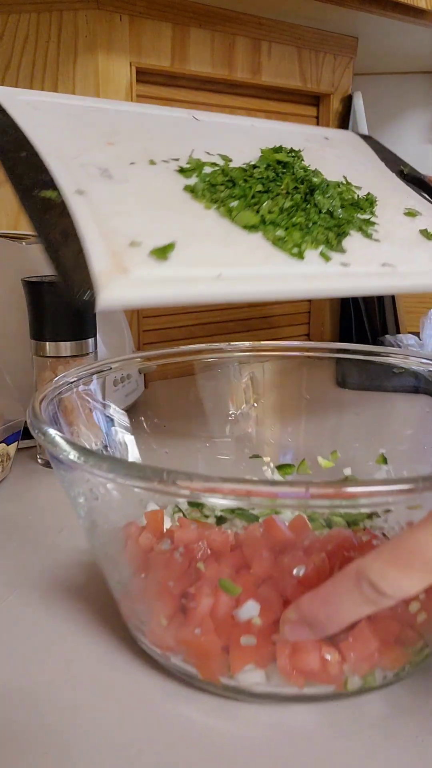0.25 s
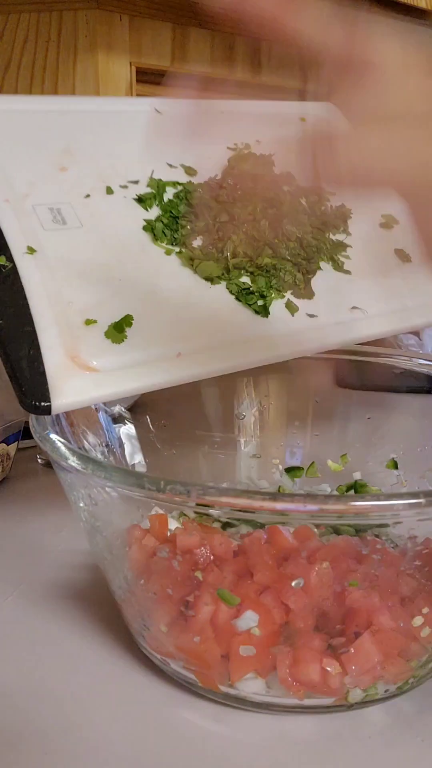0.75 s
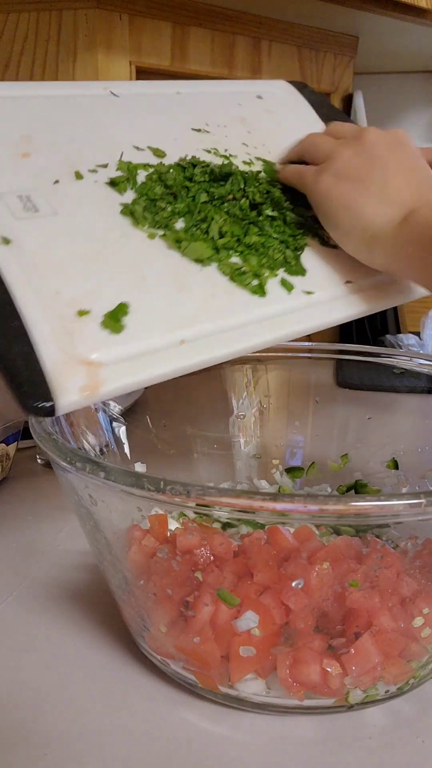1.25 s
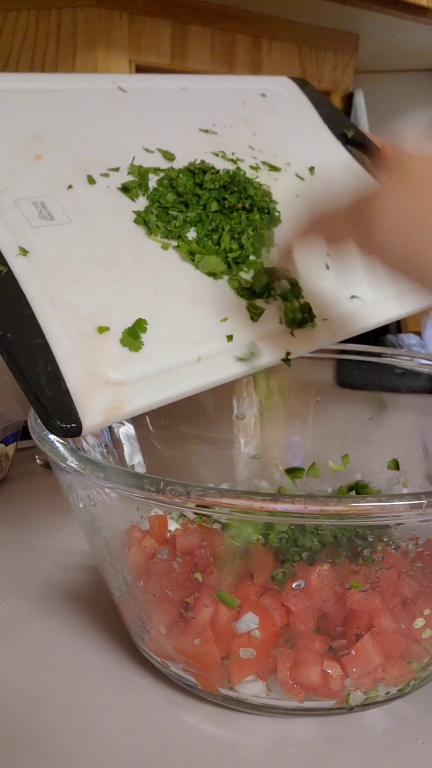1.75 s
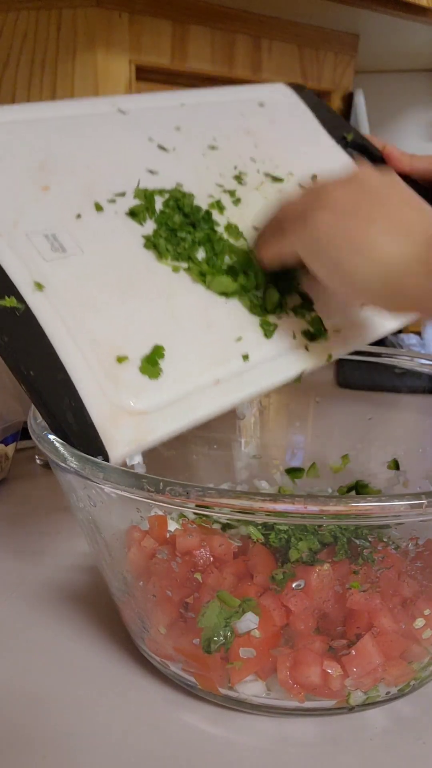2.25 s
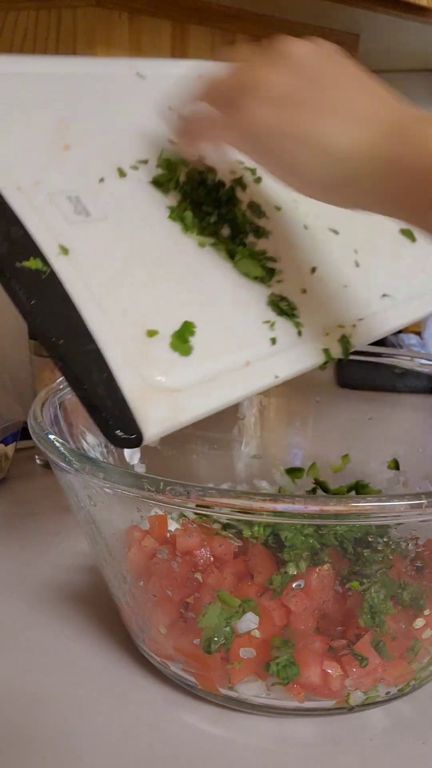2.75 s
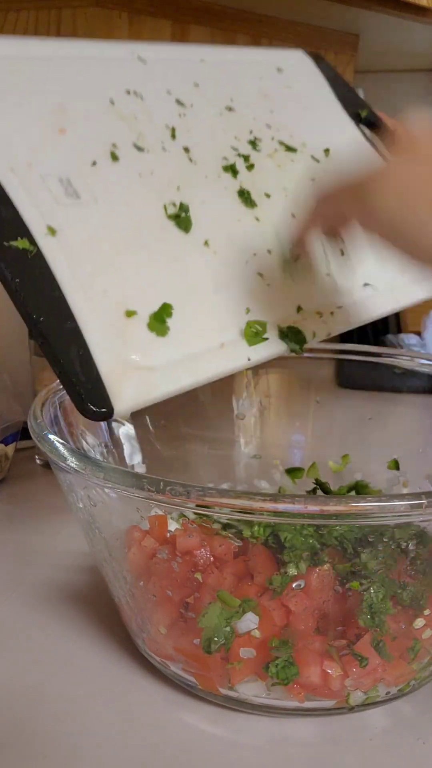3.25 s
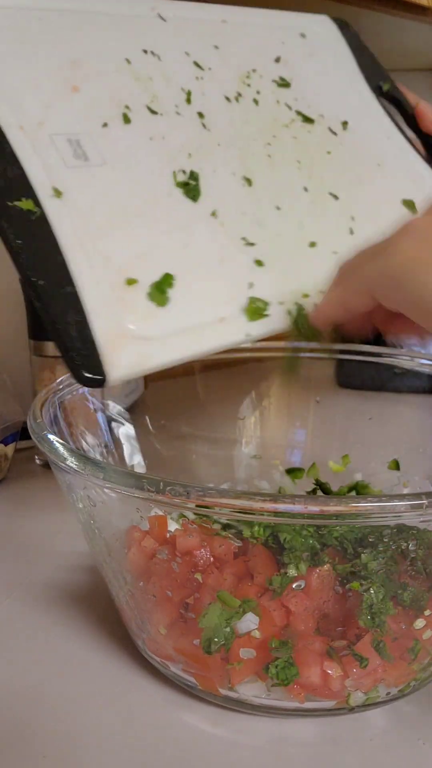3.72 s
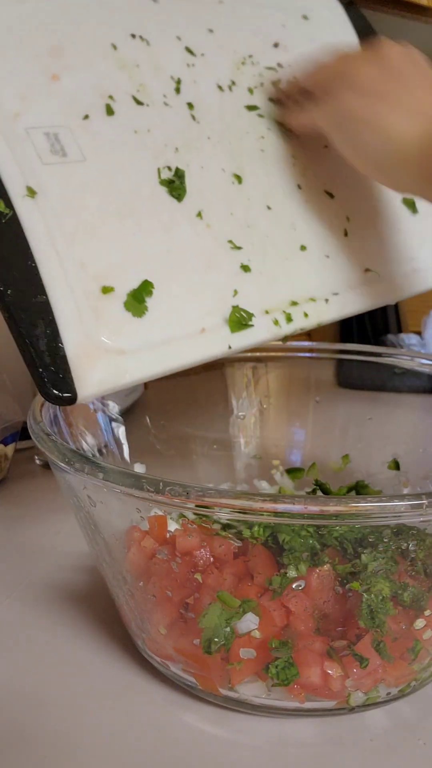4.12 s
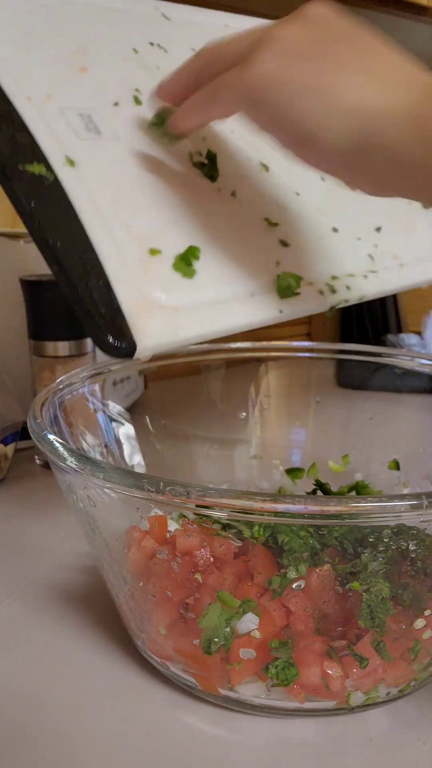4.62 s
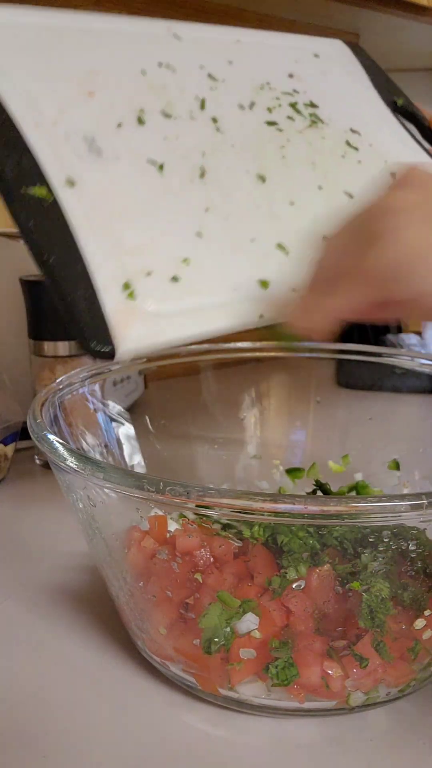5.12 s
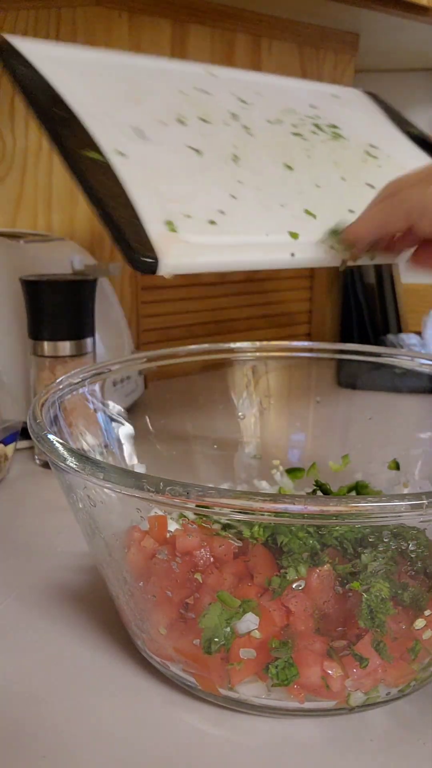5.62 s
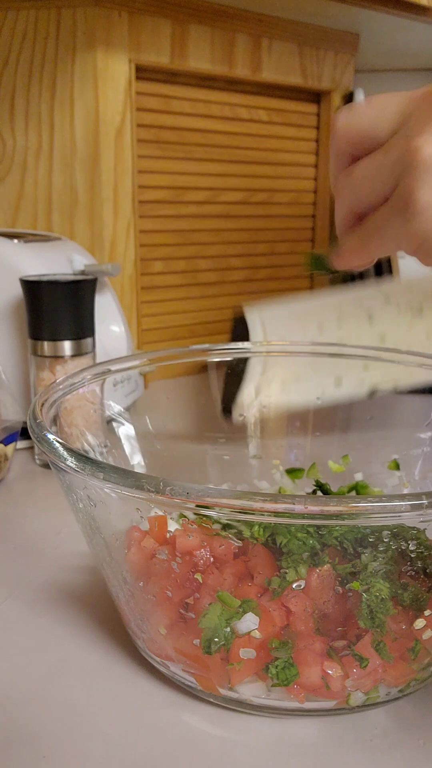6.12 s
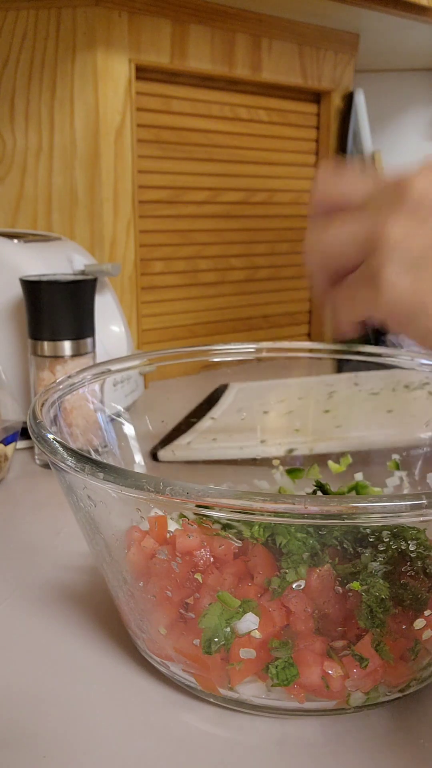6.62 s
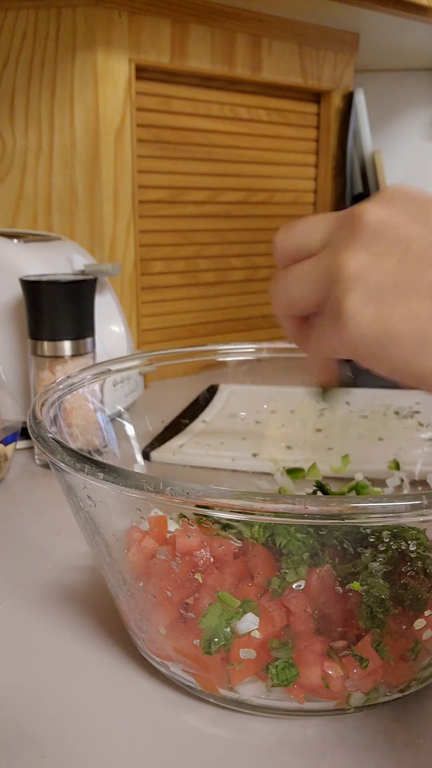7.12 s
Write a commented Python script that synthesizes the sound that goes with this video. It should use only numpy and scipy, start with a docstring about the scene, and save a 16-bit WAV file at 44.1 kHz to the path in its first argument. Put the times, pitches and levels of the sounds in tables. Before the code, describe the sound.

Fingers rub and flick wet chopped herbs off a plastic board after a knock against a glass bowl, over a low refrigerator hum.

```python
"""A refrigerator hums in a small kitchen throughout. First a plastic cutting board bumps against a
glass bowl, and the glass rings briefly. Then a hand sweeps chopped herbs off the board, stroke by
stroke: skin and wet leaves rub, hiss and squelch, and the fingers flick over the edge. At last the
board is laid on the counter, where it rocks from edge to edge and rattles to rest."""
import sys
import numpy as np
from scipy import signal
from scipy.fft import rfft, irfft, next_fast_len
from scipy.io import wavfile
from scipy.ndimage import map_coordinates

SR = 44100
rng = np.random.default_rng(int(sys.argv[2]) if len(sys.argv) > 2 else 0)


def inscribe(sig):
    """Save sig as 16-bit PCM at rate SR to the path in sys.argv[1].

    A 1-D sig is mono; a 2-D sig holds one channel per row.
    Samples are clipped to [-1, 1] before scaling.
    """
    pcm = np.round(np.clip(np.atleast_2d(sig).T, -1, 1) * 32767)
    wavfile.write(sys.argv[1], SR, pcm.astype(np.int16))


N = 324576

# The tone of skin and leaves rubbing on plastic: pitch_hz, level_db
RUB_TONE = [(150, -56), (400, -0.5), (800, -4.5), (1400, -3), (2050, -2.5), (2600, -4.5), (3600, -1.5),
            (5000, -5), (6300, -8.5), (7600, -5), (9000, -17), (16000, -50)]
# A low note of the board, heard as a soft thump: pitch_hz, level_db, fade_s (time to fall by 60 dB)
THUMP_NOTE = [(208.8, 0, 0.11)]


def amp(db):
    """Turn decibels into a volume factor."""
    return 10 ** (np.asarray(db) / 20)


def unit(x):
    """Scale a signal to an average (rms) level of 1."""
    return x / np.sqrt(np.mean(x ** 2) + 1e-20)


def along(points, hz):
    """Read between the rows of a (pitch_hz, value) table, giving each octave equal room."""
    pitches, values = np.transpose(points)
    return np.interp(np.log(hz + 1), np.log(pitches), values)


def wobble(rate):
    """A smooth curve through `rate` random values a second."""
    return map_coordinates(rng.standard_normal(int(N * rate / SR) + 4), [np.arange(N) * rate / SR])


def filtered(x, response):
    """Multiply each frequency in x by response(hz)."""
    n = x.shape[-1]
    padded = next_fast_len(n + 8192)
    return irfft(rfft(x, padded) * response(np.fft.rfftfreq(padded, 1 / SR)), padded)[..., :n]


def noise(tone, grain_db=0):
    """Noise with a given tone; grain_db breaks it into tiny slips of uneven size."""
    slips = rng.standard_normal(N) * amp(grain_db * wobble(900))
    return unit(filtered(slips, lambda hz: amp(along(tone, hz))))


def narrow_noise(pitch_hz, width_hz, size):
    """Noise close to one pitch, `size` samples long."""
    return unit(filtered(rng.standard_normal(size), lambda hz: np.exp(-((hz - pitch_hz) / width_hz) ** 2)))


def spread(pair, likeness):
    """Blend two unrelated signals into left and right (likeness 1: the same, 0: unrelated)."""
    turn = lambda hz: np.arccos(np.clip(along(likeness, hz), -1, 1)) / 2
    mid, side = filtered(pair, lambda hz: np.array([np.cos(turn(hz)), np.sin(turn(hz))]))
    return np.array([mid + side, mid - side])


def add(track, start_s, sound):
    """Mix a sound into a track."""
    part = track[..., max(round(start_s * SR), 0):][..., :sound.shape[-1]]
    part += sound[..., :part.shape[-1]]


def ring(notes, attack_s, dull_above_hz):
    """A struck object rings with its own fading notes; the blow barely stirs the highest ones."""
    t = np.arange(SR) / SR
    hz, db, fade_s = np.transpose(notes)[:, :, None]
    strength = amp(db) / (1 + (hz / dull_above_hz) ** 2)
    sign = (-1) ** np.arange(len(hz))[:, None]  # neighbouring notes start in opposite directions
    tones = sign * strength * amp(-60 * t / fade_s) * np.sin(2 * np.pi * hz * t)
    return tones.sum(0) * (1 - np.exp(-t / attack_s)) / np.linalg.norm(amp(db))


def knocks(blows, notes, clack_tone, tick_tone, contact_s, tick_db, attack_s, bright_hz,
           clack_fade_s, tick_fade_s):
    """Each blow makes the board thump; harder contact adds plastic clack and, faster still, gritty tick."""
    t = np.arange(SR // 2) / SR
    thump, clack, tick = np.zeros((3, N))
    for start_s, thump_db, hardness_db in blows:
        dull_above_hz = bright_hz * amp(.8 * thump_db)  # gentle blows are duller
        clack_db = thump_db + hardness_db
        touch_s = contact_s * (1 + max(-21 - hardness_db, 0) / 5)  # soft blows touch for longer
        press = np.minimum(t / (0.33 * touch_s), 1)
        since = np.maximum(t - touch_s, 0)
        add(thump, start_s, amp(thump_db) * ring(notes, attack_s, dull_above_hz))
        add(clack, start_s, press * amp(clack_db - 60 * since / clack_fade_s))
        add(tick, start_s, press * amp(clack_db + tick_db + 1.05 * hardness_db - 60 * since / tick_fade_s))
    return thump, clack * noise(clack_tone) + tick * noise(tick_tone, grain_db=-5.5)


def in_kitchen(x, lead_ms, left_db, near_db, room_db, step, near_fade_s=0.066):
    """Direct sound in stereo, quick echoes off counter and cupboards, then the room's fading tail."""
    room_fades = [(150, 0.51), (1000, 0.22), (4500, 0.27), (9000, 0.092), (15000, 0.21)]  # how long the room rings: pitch_hz, fade_s
    echo_likeness = [(100, .9), (300, 0.95), (1200, 0), (3000, 0.018)]  # how alike left and right are: pitch_hz, likeness
    direct = filtered(x, lambda hz: np.exp(np.outer([1, -1], 1j * np.pi * hz * lead_ms / 1e3)))
    direct *= amp([[left_db], [-left_db]])
    hz, t, scatter = signal.stft(rng.standard_normal((2, 2, SR // 2)), SR, nperseg=256)
    near_decay = amp(-60 * t / near_fade_s) * np.ones((len(hz), 1))
    room_decay = amp(-60 * t / along(room_fades, hz)[:, None])
    decay = np.array([near_decay, room_decay])[:, None]
    padded = np.pad(x, (step, 2 * step))
    echoes = np.zeros((2, N + step))
    for start in range(0, N + step, step):  # the source moves: a new echo pattern every `step` samples
        piece = padded[start:start + 2 * step] * signal.windows.cosine(2 * step)
        shift = rng.integers(len(t))
        if np.abs(piece).max() > 1e-5:
            near, tail = signal.istft(np.roll(scatter, shift, axis=-1) * decay, SR, nperseg=256)[1]
            echo = amp(near_db) * near / np.linalg.norm(near[0])
            echo += amp(room_db) * tail / np.linalg.norm(tail[0])
            add(echoes, start / SR + .001, signal.fftconvolve(piece[None], echo, axes=1))
    return direct + spread(echoes[:, step:], echo_likeness)


def refrigerator(drift_s=0.00011):
    """The compressor hums, its shaft drifting slightly, with thin whines over the rush of a fan."""
    hum_notes = [(59.2, -58), (118.4, -56), (328.4, -78.5), (495.3, -72), (699.8, -75), (818.3, -82.5)]  # the compressor's steady notes: pitch_hz, level_db
    whines = [(4970, -97), (7250, -96.5)]  # thin high whines: pitch_hz, level_db
    fan_tone = [(18, -24.5), (45, -4), (85, -3), (150, -6), (330, -12), (500, -15), (600, -18), (720, -12),
                (1000, -27.5), (1400, -28.5), (2500, -44), (6000, -47.5), (7100, -44.5), (8500, -56),
                (15500, -57)]  # rushing air: pitch_hz, level_db
    fan_likeness = [(100, 0.88), (300, 0.89), (800, 0.077), (2000, 0), (8000, 0)]  # how alike left and right are: pitch_hz, likeness
    t = np.arange(N) / SR
    hum = np.zeros(N)
    for hz, db in hum_notes:
        peak = amp(db + 1.5 * wobble(5.6)) * np.sqrt(2)
        hum += peak * np.sin(2 * np.pi * hz * (t + drift_s * wobble(8.9)))
    whine = sum(amp(db) * narrow_noise(hz, width_hz=55, size=N) for hz, db in whines)
    fan = spread(np.array([noise(fan_tone), noise(fan_tone)]), fan_likeness)
    return (hum + whine + amp(-57.5) * fan) * amp([[-.3], [.3]])


def bowl_ping():
    """The glass rings briefly as the steadying hand lets go."""
    glass_notes = [(501, -9, .8), (1093, -11, .42), (1841, -1, .48), (2864, -14, .16), (3945, 1, .065),
                   (5033, -20, .12), (5545, -27, .14), (6578, -30, .14)]  # the bowl's own notes: pitch_hz, level_db, fade_s
    pings = [(0.7214, -40)]  # a fingertip catches the rim: start_s, level_db
    out = np.zeros(N)
    for start_s, db in pings:
        add(out, start_s, amp(db) * ring(glass_notes, attack_s=0.00015, dull_above_hz=15000))
    return out


def board_on_bowl():
    """The board bumps the bowl, giving a low thump and a bright clack."""
    bumps = [(.039, -8.5, -15), (.186, -28.5, -27.5), (.213, -29.5, -31.5), (.362, -43.5, -34.5),
             (.4885, -32.5, 3.5), (.508, -23.5, -28.5), (.720, -63.5, 3), (.805, -38.5, -39),
             (.842, -32, -21.5), (1.657, -33.5, -38), (1.694, -30.5, -23)]  # the blows: start_s, thump_db, hardness_db (clack above thump)
    board_notes = [(106.5, .5, .21), (152, 2.5, .14), (217, .5, .17), (280.5, -4.5, .16),
                   (360.6, -.5, .085), (398, -9, .096), (484, -6, .077), (585, -1, 0.086),
                   (950, -11.5, 0.047), (1148, -10, 0.11), (1334, -12.5, 0.024), (1684, -12, 0.058),
                   (2220, -17, 0.048), (4240, -21, .04)]  # the board ringing against glass: pitch_hz, level_db, fade_s
    clack_tone = [(80, -38), (250, -3), (500, 0), (750, -3.5), (950, 0), (1400, -6), (2300, -12.5),
                  (3000, -19), (4200, -18), (5500, -27.5), (16000, -55)]  # the plastic clack: pitch_hz, level_db
    tick_tone = [(800, -14.5), (2500, -7), (4400, -3.5), (6000, -5.5), (8000, 3.5), (10000, -3),
                 (12000, -1), (15000, -9), (16500, -18.5)]  # the gritty tick: pitch_hz, level_db
    return knocks(bumps, board_notes, clack_tone, tick_tone, contact_s=0.0054, tick_db=-4.5,
                  attack_s=.0016, bright_hz=12000, clack_fade_s=.04, tick_fade_s=.018)


def rocking(count=6, let_go_s=6.6705, first_gap_s=.0345, gap_ratio=.97):
    """The board rocks from edge to edge; friction eats the swing, so blows come sooner and die down."""
    blow = np.arange(count)
    start_s = let_go_s + first_gap_s * (1 - gap_ratio ** blow) / (1 - gap_ratio)
    swing_db = 20 * np.log10(1 - blow / count)
    slap_db = 2 * (blow % 2)  # every second blow is a sharper slap
    thump_db = -22.5 + .5 * swing_db - slap_db
    hardness_db = -10.5 + .35 * swing_db + 2 * slap_db
    return list(zip(start_s, thump_db, hardness_db))


def board_on_counter():
    """The board meets the counter and rattles to rest, giving thumps and dull clacks."""
    touches = [(6.085, -42.5, -22), (6.430, -31, -21.5), (6.95, -72.5, 7.5), (7.276, -59.5, 2.5)]  # the board is set down: start_s, thump_db, hardness_db
    board_notes = [(114, -3, .2), (153, -2, .18), (216, -1.5, .17), (295, -8, .08), (402, -1.5, .11),
                   (560, -7, .05), (770, -11, .05)]  # the board ringing on the counter: pitch_hz, level_db, fade_s
    clack_tone = [(70, -42), (200, -8), (450, 5.5), (780, -5), (1100, -14), (2000, -24.5), (4000, -40),
                  (9000, -81.5)]  # the dull clack: pitch_hz, level_db
    tick_tone = [(800, 11.5), (3500, 3.5), (6000, -8.5), (9000, -28), (15000, -33)]  # the dull tick: pitch_hz, level_db
    return knocks(touches + rocking(), board_notes, clack_tone, tick_tone, contact_s=0.0022, tick_db=-10,
                  attack_s=.003, bright_hz=25000, clack_fade_s=.06, tick_fade_s=.06)


def finger_presses():
    """The fingers land on the board, and it bounces briefly with a soft, low thump."""
    landings = [(2.175, -43), (2.29, -47.5), (4.312, -36.5)]  # the fingers land: start_s, level_db
    out = np.zeros(N)
    for start_s, db in landings:
        add(out, start_s, amp(db) * ring(THUMP_NOTE, attack_s=0.0044, dull_above_hz=2000))
    return out


def leaf_squelches():
    """A film of juice sticks and slips under the fingers, making noise close to one pitch."""
    squelches = [(1.552, -66, 0.11, 5700), (2.385, -65.5, 0.16, 5630), (3.144, -53.5, 0.095, 4900),
                 (4.301, -71, 0.24, 3360)]  # wet leaves are squeezed: start_s, level_db, length_s, pitch_hz
    out = np.zeros(N)
    for start_s, db, length_s, pitch_hz in squelches:
        size = round(length_s * SR)
        swell = amp(db) * np.sin(np.linspace(0, np.pi, size))
        add(out, start_s, swell * narrow_noise(pitch_hz, width_hz=750, size=size))
    return out


def finger_flicks(hollow_loss_db_per_s=4):
    """Fingers rasp over the board's edge; the board sounds hollow and springs back."""
    flicks = [(1.662, -51, 0.088), (1.732, -48.5, 0.031), (1.777, -46, 0.0117), (2.494, -44.5, 0.096),
              (2.603, -48.5, 0.011), (3.237, -42.5, 0.057), (3.852, -41, 0.034), (4.526, -49.5, 0.018),
              (4.547, -42.5, 0.0216), (4.961, -44, 0.028), (5.266, -46.5, 0.012), (5.74, -46.5, 0.035)]  # slips over the edge: start_s, level_db, length_s
    rasp_tone = [(700, -16.5), (1500, -16), (2050, -3.5), (2650, -6.5), (3300, 1), (4400, 0), (5100, 1),
                 (6300, -5), (7400, -3.5), (8400, -11.5), (11000, -21.5), (15800, -23)]  # skin on the edge: pitch_hz, level_db
    hollow_tone = [(150, -50), (300, -48), (450, -9.5), (600, -0.5), (760, -6.5), (990, 2), (1200, -12),
                   (1500, -3.5), (2200, -6.5), (3500, -49)]  # the board's hollow lower range: pitch_hz, level_db
    rasp, hollow, spring = np.zeros((3, N))
    recoil = ring(THUMP_NOTE, attack_s=0.0062, dull_above_hz=2000)
    for start_s, db, length_s in flicks:
        swell = amp(db) * np.abs(np.sin(np.linspace(0, np.pi, round(length_s * SR)))) ** 1.27
        hollow_db = -1.5 - hollow_loss_db_per_s * (start_s - flicks[0][0])  # weaker as the heap is used up
        add(rasp, start_s, swell)
        add(hollow, start_s, amp(hollow_db) * swell)
        add(spring, start_s + length_s / 4, amp(db - 4) * recoil)
    return rasp * noise(rasp_tone, grain_db=1.5) + hollow * noise(hollow_tone) + spring


def stem_snaps(snaps_per_s=260):
    """Bits of stem catch and let go in tiny scattered snaps."""
    snaps = (rng.random(N) < snaps_per_s / SR) * rng.standard_normal(N)
    return unit(filtered(snaps, lambda hz: amp(along(RUB_TONE, hz))))


def shifting_tone(x, depth_db, width_hz=170, hold_s=0.051):
    """The board's notes stand out and sink again as the fingers travel across it."""
    spectrum = signal.stft(x, nperseg=1024)[2]
    pitch_blur = signal.windows.hann(int(2 * width_hz * 1024 / SR) + 3)[:, None]
    time_blur = signal.windows.hann(int(2 * hold_s * SR / 512) + 3)
    patches = signal.fftconvolve(rng.standard_normal(spectrum.shape), pitch_blur * time_blur, mode="same")
    return unit(signal.istft(spectrum * amp(depth_db * unit(patches)), nperseg=1024)[1][:N])


def hand_sweeps(settle_s=.07, lift_s=.035):
    """Skin and wet leaves drag over textured plastic in countless tiny slips as the pressure changes."""
    strokes = [(.185, 0.246, .255, -62, -70, 5.5), (1.158, 1.30, 1.457, -59, -75, 6),
               (1.456, 1.677, 1.825, -53.5, -57, 15), (2.147, 2.33, 2.325, -56.5, -61.5, 15),
               (2.306, 2.466, 2.466, -61.5, -63, -0.5), (3.008, 3.182, 3.264, -54.5, -55, 10),
               (3.617, 3.77, 3.81, -58, -63.5, -1.5), (4.212, 4.33, 4.52, -61.5, -70.5, 5.5),
               (4.816, 4.91, 4.99, -59.5, -62, 8), (5.152, 5.265, 5.30, -69, -63.5, 7.5),
               (5.578, 5.76, 5.755, -65.5, -69, 4), (5.825, 5.96, 6.03, -81.5, -95.5, 5)]  # the hand's pushes: start_s, hardest_s, end_s, rub_db, hiss_db, swell_db
    hiss_tone = [(2000, -19), (5000, -1.5), (8000, 3), (10000, -5.5), (12500, 1), (15800, -3.5)]  # the hiss of wet leaves: pitch_hz, level_db
    t = np.arange(N) / SR
    rub, hiss = np.zeros((2, N))
    for start_s, hardest_s, end_s, rub_db, hiss_db, swell_db in strokes:
        touch = np.clip((t - start_s) / settle_s, 0, 1) ** 2 * np.clip(1 - (t - end_s) / lift_s, 0, 1)
        press_db = np.interp(t, [start_s, hardest_s, end_s], [-swell_db, 0, -swell_db])
        rub += touch * amp(rub_db + press_db)
        hiss += touch * amp(hiss_db + 1.9 * press_db)  # pressure raises the hiss faster than the rub
    unsteady = amp(1.3 * wobble(40))
    slips = shifting_tone(noise(RUB_TONE, grain_db=2), depth_db=2)
    drag = amp(-2.5) * slips + amp(-8) * stem_snaps()
    return unsteady * (rub * drag + hiss * noise(hiss_tone, grain_db=0.5))


def scene():
    """Board, bowl and hand, each at its own place in the kitchen, over the refrigerator."""
    bump, bump_clack = board_on_bowl()
    thud, thud_clack = board_on_counter()
    held_board = bump + finger_presses()
    mix = in_kitchen(held_board, lead_ms=-.22, left_db=-.6, near_db=-15, room_db=-13, step=SR // 4)
    mix += in_kitchen(thud, lead_ms=.25, left_db=-.2, near_db=-15, room_db=-14, step=SR // 4)
    mix += in_kitchen(bump_clack, lead_ms=-.0091, left_db=-3.3, near_db=-2, room_db=-7, step=SR // 8,
                      near_fade_s=.04)
    mix += in_kitchen(thud_clack, lead_ms=.19, left_db=-.5, near_db=-1, room_db=-5.5, step=SR // 8)
    mix += in_kitchen(bowl_ping(), lead_ms=.06, left_db=0, near_db=-10, room_db=-10, step=SR)
    hand = hand_sweeps() + finger_flicks() + leaf_squelches()
    mix += in_kitchen(hand, lead_ms=.19, left_db=2.5, near_db=0, room_db=-5, step=SR // 16)
    return mix + refrigerator()


def record(dry):
    """Cut away the very highest treble."""
    top_hz = 15850
    return filtered(dry, lambda hz: np.clip((top_hz - hz) / 400 + .5, 0, 1))


dry = scene()
out = record(dry)
inscribe(out)
```